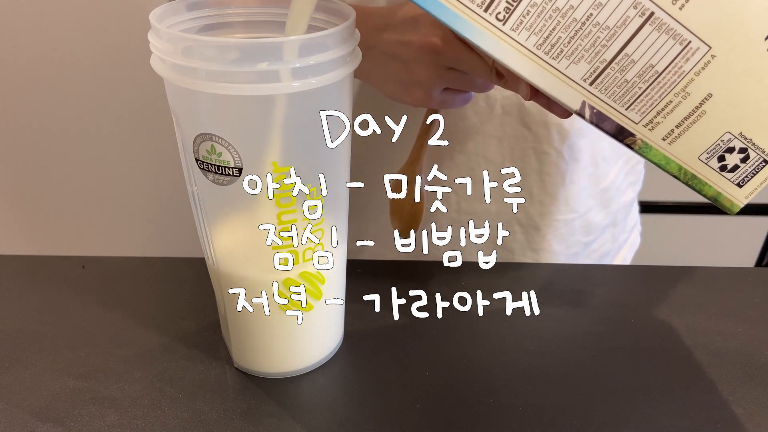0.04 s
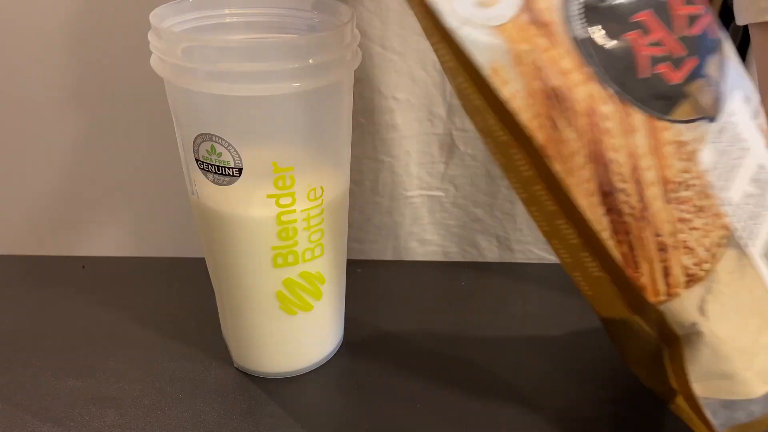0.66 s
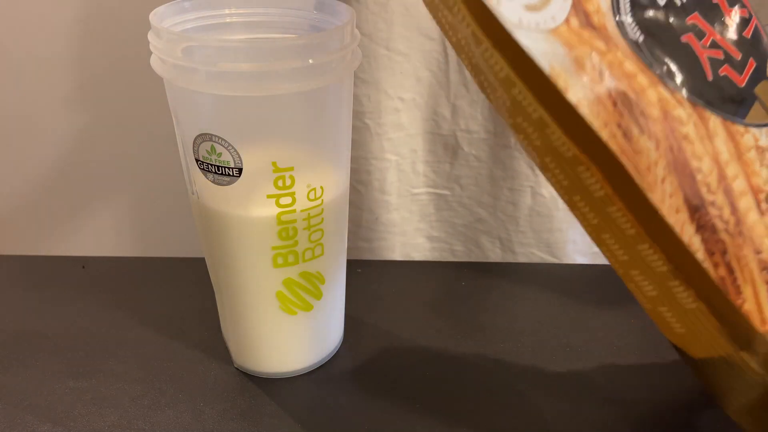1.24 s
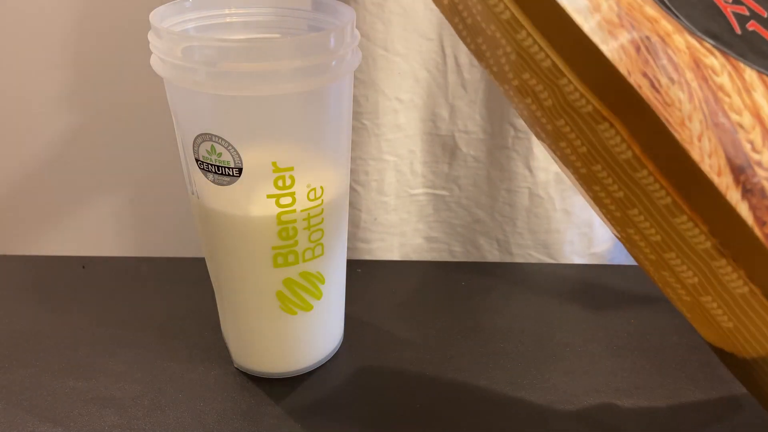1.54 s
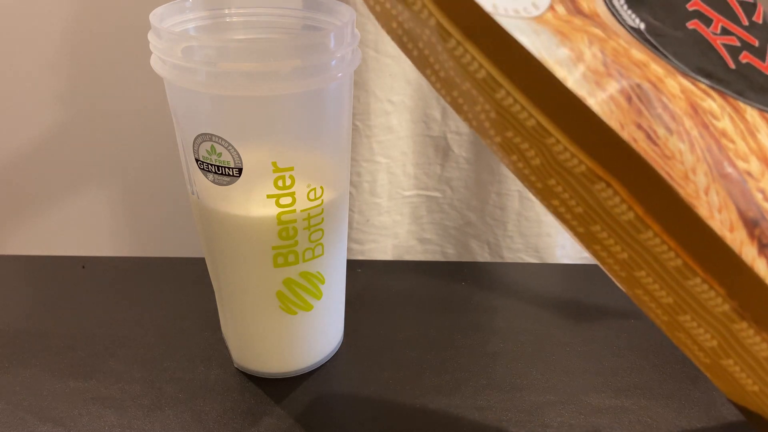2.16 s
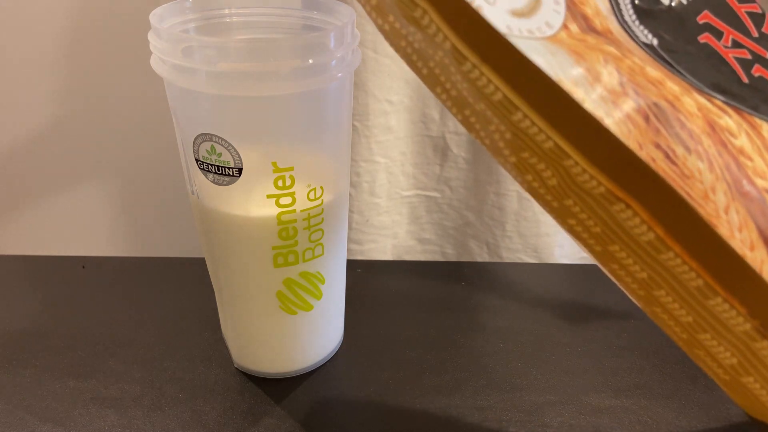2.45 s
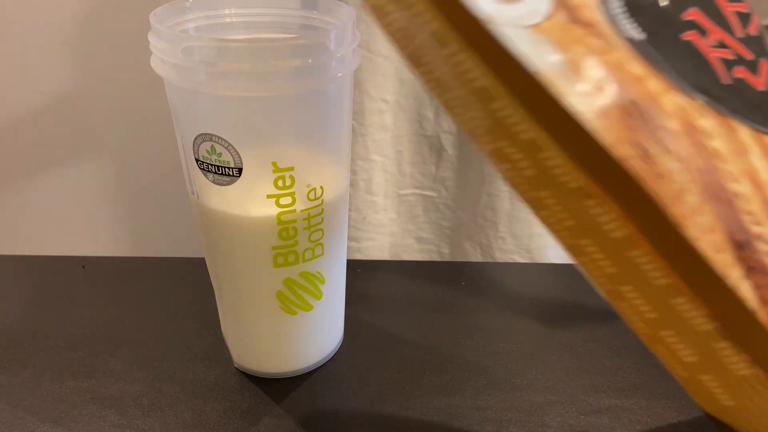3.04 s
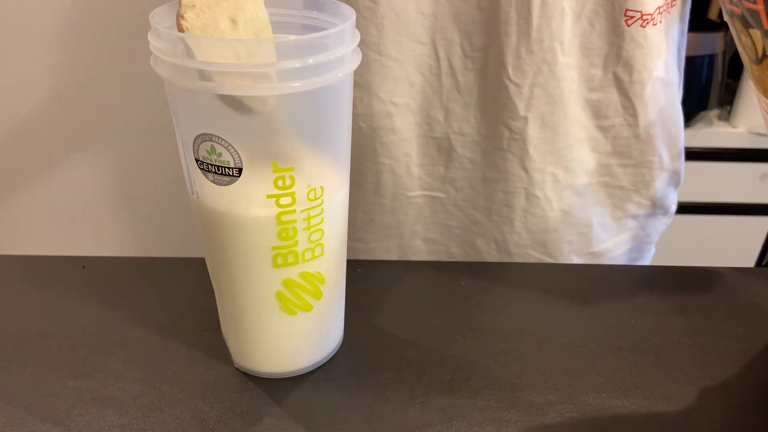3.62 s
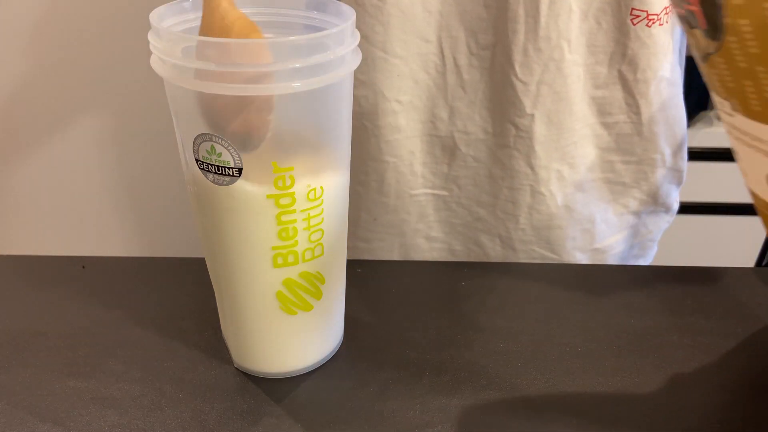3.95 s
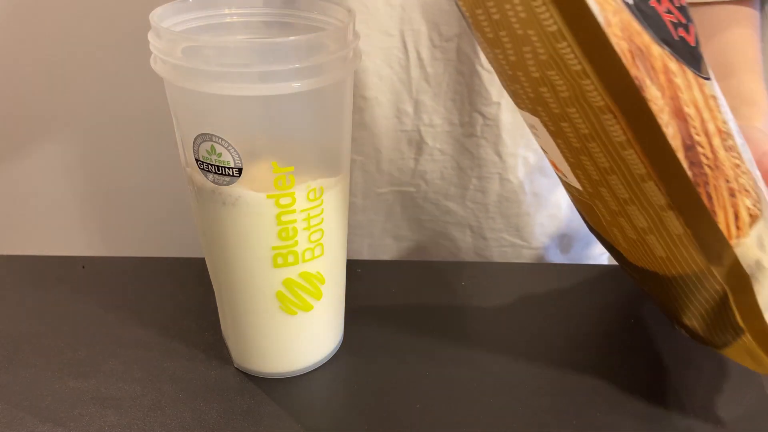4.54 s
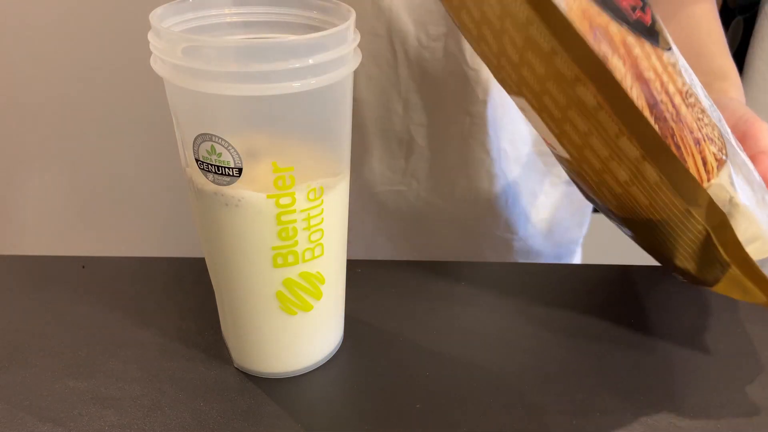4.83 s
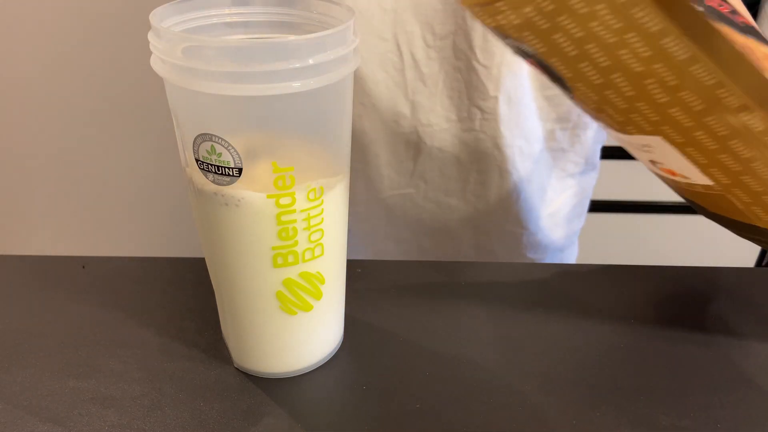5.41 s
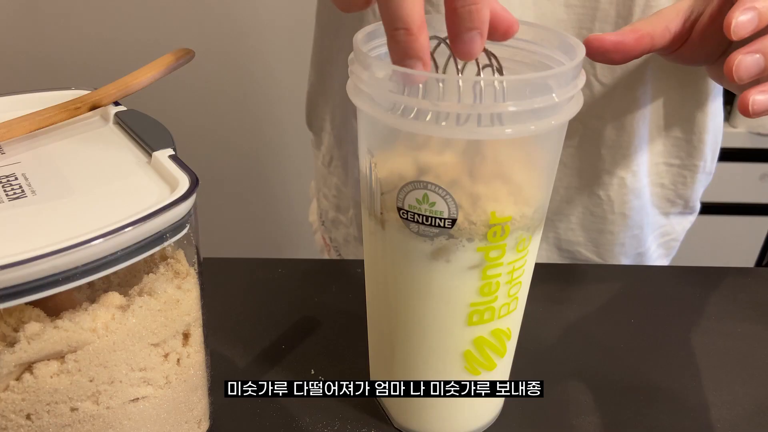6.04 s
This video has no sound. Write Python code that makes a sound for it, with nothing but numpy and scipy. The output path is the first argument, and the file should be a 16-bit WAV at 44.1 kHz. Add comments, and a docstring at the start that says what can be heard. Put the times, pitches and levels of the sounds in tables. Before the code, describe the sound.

Close kitchen handling sounds: a pouch set down and scooped from, a soft plop, a spoon tap, then crackling film and light clicks.

```python
"""A foil pouch of grain powder is set down on a kitchen table, rummaged in, put down again and pressed:
its creases crack, its film crinkles and its weight thumps the table. Early on, the last milk drips into a
plastic shaker cup, ringing tiny bubbles. Midway, a spoonful plops in and the wooden spoon taps the cup,
ringing its wall and the air inside. At the end a wire whisk ball clicks on the rim. A low appliance hum
fills the small room, and everything is heard through a phone close by."""
import sys
import numpy as np
from scipy import signal
from scipy.fft import rfft, irfft, next_fast_len
from scipy.io import wavfile

SR = 44100
rng = np.random.default_rng(int(sys.argv[2]) if len(sys.argv) > 2 else 0)


def dump(signal):
    """Clip the signal to [-1, 1] and save it as 16-bit WAV at the path in sys.argv[1]."""
    limited = np.clip(np.atleast_2d(signal).T, -1, 1)
    pcm = np.round(limited * 32767).astype(np.int16)
    wavfile.write(sys.argv[1], SR, pcm)


N = 276751
SIZE = 2 ** 15  # samples in one short sound or echo
TIME = np.arange(N) / SR
HZ = np.maximum(np.arange(SIZE // 2 + 1) * SR / SIZE, 1)

# The pouch is set down:
# (time [s], brushing before [s], delay of the thump [s], film level [dB], knock [dB], thump [dB])
LANDINGS = [(0.7542, .013, 0.0124, -41, -35.5, -23.5), (4.885, 0.03, 0.02, -36, -38, -27)]
# A fold gives way: (time [s], level [dB], crumbling time [s], treble edge [Hz])
FOLDS = [(4.728, -49.5, 0.043, 4500), (4.751, -49.5, 0.05, 5850), (5.407, -43.5, 0.021, 8700),
         (5.445, -49, 0.017, 12200), (5.491, -49.5, 0.0058, 11600), (5.750, -46.5, 0.028, 8900)]
# Creases crack, and the spoon ticks once inside the pouch (the 2.223 s row): (time [s], level [dB], tilt
# [dB/octave], treble edge [Hz], stiffness [pitch factor])
CRACKS = [(0.7997, -56, 9.5, 6960, 0.5), (0.901, -56.5, 10, 6000, 1.27), (2.223, -73, -6.5, 1410, 0.73),
          (4.8844, -27.5, 2.2, 17500, 1.16), (5.096, -42, 1, 6400, .92), (5.247, -42, -0.5, 5000, 1.02),
          (5.288, -29.5, -2, 5570, 1), (5.591, -64.5, -6, 7840, 1), (5.6481, -45.5, -2.5, 4500, 0.94),
          (5.69, -50.5, -0.5, 10000, 1.1), (5.7572, -46.5, 4, 9500, 1.04), (5.901, -54, 4, 9960, 1.24),
          (5.933, -59.5, 5.5, 12100, 0.98)]
# The spoon digs in the pouch: (time [s], hold [s], level [dB], pitch of the scraped patch [Hz])
SCOOPS = [(0.83, 0.14, -62, 1330), (0.987, 0.032, -63, 3500), (1.052, 0.1, -61.5, 1650),
          (1.179, 0.033, -59.5, 2100), (1.35, 0.13, -74.5, 3200), (1.55, .18, -84, 2400),
          (1.747, 0.079, -68.5, 1600), (1.862, 0.087, -72, 1370)]
# Rubbing strokes: (time [s], hold [s], level [dB])
SPOON_PULL_OUT = [(3.144, 0.019, -53.5)]
PRESSES = [(4.9, 0.18, -57), (5.15, 0.16, -52.5), (5.41, 0.028, -50.5), (5.67, 0.082, -48.5)]
FILM_SLIPS = [(4.9, 0.25, -62), (5.14, 0.11, -57.5), (5.29, 0.19, -62), (5.52, 0.29, -67.5),
              (5.69, 0.25, -67.5)]
POWDER_SLIDES = [(3.755, 0.067, -67)]
# Light bumps on the table: (time [s], level [dB])
BUMPS = [(4.95, -44), (5.057, -48), (5.292, -40.5), (5.503, -44), (6.151, -48.5)]
# A pouch corner meets the table before the full weight: (time [s], level [dB], treble edge [Hz])
CORNERS = [(.742, -34, 84), (4.888, -35, 430)]
# The spoon taps the cup: (time [s], level [dB], treble edge [Hz])
TAPS = [(4.063, -45, 1650), (4.0937, -66.5, 7050)]
# Drops of milk: (time [s], bubble pitch [Hz], level [dB], ring width [Hz])
DRIPS = [(.345, 4970, -71, 268), (0.488, 2500, -76, 151)]
# The whisk ball clicks: (time [s], level [dB], rattling time [s])
WHISK_CLICKS = [(6.148, -37.5, 0.0034), (6.1615, -49.5, .006), (6.228, -50, 0.0013)]

# Modes, the notes a thing rings at; narrow ones ring longer: (pitch [Hz], width [Hz], level [dB])
POUCH_MODES = [(447, 1600, 0), (755, 55, 7), (1290, 300, 2.5), (1755, 130, 2), (2110, 160, -1),
               (3115, 320, -5.5), (4030, 540, -11), (6520, 13000, -23), (12300, 12000, -5.5)]
CREASE_MODES = [(728, 110, -1), (1280, 250, -1.5), (1597, 150, 6.5), (1790, 98, 4.5), (2180, 110, -4),
                (3030, 570, -8.5), (4110, 410, -8), (7300, 5900, -19), (10380, 2500, -25.5)]
HOLLOW_MODES = [(458, 630, 0), (783, 330, 4), (1450, 180, 6), (1680, 220, -14), (3800, 500, -15)]  # the space inside the open pouch
TABLE_MODES = [(67, 15, 0.5), (91.1, 10.4, 1.5), (163.3, 7.9, -5.5), (298, 11, -7.5), (341.4, 27, -10.5)]
CUP_AIR_MODES = [(650, 130, -2.5), (756, 41, 5), (848, 26, -3.5)]  # the air above the milk
CUP_WALL_MODES = [(85.6, 4.8, 11.5), (158.8, 17, 5.5), (1580, 400, -22), (2610, 26, -9), (2670, 310, -21),
                  (3580, 440, -24), (5100, 870, -30)]
WHISK_MODES = [(703, 77, 3.5), (1290, 3200, -8.5), (1495, 14, 10.5), (5080, 1700, -6), (7600, 3500, -13.5),
               (11000, 7800, -13), (14900, 1300, -9)]

# Tone curves, from bass to treble: (frequency [Hz], level [dB])
SWISH_TONE = [(200, -1), (2600, -2.5), (3200, -18.5), (4600, -11.5), (5600, -29), (16000, -40)]
FILM_TONE = [(500, -8.5), (2500, 11.5), (8000, 4.5), (16000, 0)]
RUMBLE_TONE = [(20, -36), (40, -3.5), (58, 2.5), (85, -0.5), (120, -8), (175, -9.5), (400, -25.5),
               (760, -34.5), (4000, -45.5), (15000, -57.5)]
ECHO_TONE = [(40, -23), (220, 7), (450, 1.5), (750, 2), (1400, -1.5), (3000, 0.5), (6000, -0.5),
             (16000, -8.5)]
# How long the room echoes: (frequency [Hz], time to fade by 60 dB [s])
ECHO_TIMES = [(150, 0.44), (500, 0.29), (2000, 0.21), (2650, .38), (3700, 0.22)]
# The appliance hums: (pitch [Hz], level [dB])
HUM_NOTES = [(59.2, -63), (86.1, -67.5), (172.3, -75.5)]
# The left microphone is the brighter one: (frequency [Hz], left minus right [dB])
MIC_BALANCE = [(1300, 1), (4000, 3)]


def pouch(room):
    """Creases crack and crumple, the powder lands with a knock, and the stiff film is rubbed."""
    folds = [blow(s, db, tilt_db=-2, edge_hz=edge_hz, crumble_s=crumble_s)
             for s, db, crumble_s, edge_hz in FOLDS]
    for s, brush_s, _, film_db, _, _ in LANDINGS:
        folds += landing(s, brush_s, film_db)
    crumples = strike(folds, POUCH_MODES, clean_s=0.00026, rise=0.21, low_hz=284, side_db=-4)
    cracks = crease_cracks()
    weights = [blow(s + 0.0031, knock_db, tilt_db=-1.5, edge_hz=900, crumble_s=0.015)
               for s, _, _, _, knock_db, _ in LANDINGS]
    knocks = strike(weights, HOLLOW_MODES, clean_s=0.00074, rise=1, low_hz=150, side_db=-4)
    pull = strokes(SPOON_PULL_OUT, attack_s=0.014, release_s=0.035)
    swish = rub(pull, spectrum(SWISH_TONE), uneven_db=-1.5, patchy_db=1.5, side_db=0.5)
    press = strokes(PRESSES, attack_s=0.043, release_s=0.087)
    creasing = amp(-5.5) * flex(press)
    slips = strokes(FILM_SLIPS, attack_s=0.075, release_s=0.042)
    crinkle = rub(slips, spectrum(FILM_TONE), uneven_db=2, patchy_db=2, side_db=-6.5)
    film = crumples + knocks + rummage() + swish + creasing + crackle(press) + crinkle
    sound = place(cracks, room, pan_db=-1.5, wet_db=-7) + place(film, room, pan_db=-1, wet_db=-8.5)
    return sound * np.clip((5.95 - TIME) / 0.0014, 0, 1)  # falls silent at 5.95 s


def landing(s, brush_s, film_db):
    """The pouch's bottom brushes the table, slaps flat, then crumples under the powder's weight."""
    return [blow(s - brush_s, film_db - 3, tilt_db=0.5, edge_hz=9100, crumble_s=1.26 * brush_s),
            blow(s, db=-37.5, tilt_db=-1.5, edge_hz=SR, crumble_s=0.0033),
            blow(s + 0.008, film_db, tilt_db=-2, edge_hz=5100, crumble_s=0.039)]


def crease_cracks():
    """Single creases snap, and the spoon ticks once inside the pouch; the stiffer the crease, the higher it
    rings."""
    out = 0
    for s, db, tilt_db, edge_hz, stiffness in CRACKS:
        snap = blow(s, db, tilt_db, edge_hz, crumble_s=0.0037)
        modes = stiffen(CREASE_MODES, stiffness)
        out += strike([snap], modes, clean_s=0.0049, rise=0.31, low_hz=330, side_db=-2)
    return out


def flex(pressure):
    """Three patches of film, each of its own stiffness, rub unevenly, so the ringing keeps shifting."""
    out = 0
    for stiffness in (0.982, 1, 1.018):
        patch = resonances(stiffen(POUCH_MODES, stiffness, damping=0.5), tilt_db=1, edge_hz=3100)
        out += rub(pressure, patch, uneven_db=5, patchy_db=5.5, side_db=-9)
    return out / np.sqrt(3)


def crackle(pressure, pops_per_s=170):
    """Tiny creases pop one by one while the film is pressed."""
    popping = rng.random(N) < pops_per_s / SR
    pops = popping * rng.standard_normal((2, N)) * np.sqrt(SR / pops_per_s)
    ring = response(resonances(CREASE_MODES, tilt_db=5, edge_hz=4300))
    return amp(-3) * convolve(pops * pressure, ring)


def rummage():
    """Each scoop scrapes another patch of the pouch and rings its hollow; powder sifts over the film."""
    digging = total_effort = 0
    for s, hold_s, db, patch_hz in SCOOPS:
        effort = strokes([(s, hold_s, db)], attack_s=0.045, release_s=0.059)
        patch = resonances(HOLLOW_MODES + [(patch_hz, 300, 4)], edge_hz=5500)
        digging += rub(effort, patch, uneven_db=3.5, patchy_db=3, side_db=-7.5)
        total_effort += effort
    sifting = amp(-50) * total_effort ** 0.4  # gains 0.4 dB for each dB of effort
    soft_hiss = spectrum(FILM_TONE) / (1 + (HZ / 13000) ** 2)
    return digging + rub(sifting, soft_hiss, uneven_db=3.5, patchy_db=6, side_db=-6)


def table(room):
    """The heavy pouch and the handled cup thump the table top; heavier loads sound duller."""
    loads = BUMPS + [(s + delay_s, thump_db) for s, _, delay_s, _, _, thump_db in LANDINGS]
    heavy_db = -34  # thumps lighter than this tilt toward the treble
    blows = [blow(s, db, tilt_db=0.37 * (heavy_db - db), edge_hz=280, crumble_s=0.0007)
             for s, db in loads]
    blows += [blow(s, db, tilt_db=4, edge_hz=edge_hz, crumble_s=0.00072) for s, db, edge_hz in CORNERS]
    thumps = strike(blows, TABLE_MODES, clean_s=0.015, rise=0.3, low_hz=45, side_db=-12)
    return place(thumps, room, pan_db=0, wet_db=-11)


def cup(room):
    """Powder and spoon ring the cup's wall and the air above the milk, out through the open top."""
    before = CUP_WALL_MODES + CUP_AIR_MODES
    # The spoonful raises the milk and so the air's pitch; the spoon damps the ringing.
    after = CUP_WALL_MODES + stiffen(CUP_AIR_MODES, 1.06, damping=2.5)
    splat = strike(plop(), before, clean_s=0.0028, rise=0.13, low_hz=50.6, side_db=-0.5)
    knocks = strike(spoon_taps(), after, clean_s=0.0015, rise=0.27, low_hz=50, side_db=1.5)
    slide = strokes(POWDER_SLIDES, attack_s=0.0041, release_s=0.15)
    slide_tone = resonances(before, tilt_db=4.5, edge_hz=430)
    powder = rub(slide, slide_tone, uneven_db=2, patchy_db=-3, side_db=1)
    open_cup = response(resonances([(770, 6.8, 0)], tilt_db=3, edge_hz=970))
    faint_note = amp(-89.5) * convolve(grains(N, side_db=-2.3), open_cup)
    return place(splat + knocks + powder, room, pan_db=0, wet_db=-6) + faint_note


def plop(s=3.5115):
    """A spoonful splats on the milk, sinks with a hollow gulp, and loose crumbs follow."""
    return [blow(s, db=-30, tilt_db=1, edge_hz=4200, crumble_s=0.013),
            blow(s + 0.018, db=-32.5, tilt_db=-2, edge_hz=1160, crumble_s=0.00054),
            blow(s + 0.048, db=-43, tilt_db=2, edge_hz=2600, crumble_s=0.025)]


def spoon_taps(gap_s=0.0071, loss_db=0.5, softening=0.38):
    """The spoon knocks the wall and chatters against it, each bounce duller than the last."""
    return [blow(s + k * gap_s, db - k * loss_db, tilt_db=6, edge_hz=edge_hz * softening ** k,
                 crumble_s=0.0022)
            for s, db, edge_hz in TAPS for k in range(3)]


def whisk(room):
    """The wire ball, damped by the fingers, clicks and rattles against the plastic rim."""
    blows = [blow(s, db, tilt_db=-1, edge_hz=11300, crumble_s=rattle_s)
             for s, db, rattle_s in WHISK_CLICKS]
    clicks = strike(blows, WHISK_MODES, clean_s=0.0005, rise=0.1, low_hz=564, side_db=-6)
    return place(clicks, room, pan_db=0.5, wet_db=-5.5)


def drips(room):
    """Each last drop of milk splashes and traps a tiny ringing bubble."""
    out, t = np.zeros((2, N)), TIME[:SIZE]
    splash_ring = response(resonances([(4600, 400, 0)]))
    for s, hz, db, width in DRIPS:
        bubble = unit(np.sin(2 * np.pi * hz * t) * t * np.exp(-2 * np.pi * width * t))
        splash = convolve(grains(SIZE) * np.exp(-t / 0.0016), splash_ring)
        add(out, s, db, bubble + amp(-9) * unit(splash))
    return place(out, room, pan_db=11, wet_db=-0.5)


def kitchen_echo():
    """Dense echoes off the walls; the bass lasts longest and is alike in left and right."""
    t = TIME[:SIZE]
    centres, fade_times = np.transpose(ECHO_TIMES)
    mid, side = rfft(rng.standard_normal((2, SIZE)))
    apart = HZ ** 2 / (HZ ** 2 + 300 ** 2)
    noise = (mid + apart * np.array([side, -side])) / np.sqrt(1 + apart ** 2)
    tail = 0
    for share, fade_s in zip(np.eye(len(centres)), fade_times):
        band = np.interp(np.log(HZ), np.log(centres), share)
        tail += irfft(noise * band) * amp(-60 * t / fade_s)
    tail = unit(tail * (1 - np.exp(-t / 0.0018)))
    return convolve(tail, response(spectrum(ECHO_TONE)))


def background():
    """Steady rumble and faint hiss, with the wavering hum of an appliance."""
    tone = spectrum(RUMBLE_TONE)
    rumble = amp(-62) * convolve(grains(N, side_db=-7), response(tone))
    wide_hiss = amp(-78) * convolve(grains(N, side_db=25), response(tone * HZ / (HZ + 600)))
    hum = sum(amp(db) * np.sqrt(2) * np.sin(2 * np.pi * hz * TIME + 0.55 * wander(per_s=4.6))
              for hz, db in HUM_NOTES)
    return rumble + wide_hiss + hum


def blow(s, db, tilt_db, edge_hz, crumble_s):
    """One hit: its time, level, tilt per octave, treble edge and the time it takes to crumble."""
    return s, db, tilt_db, edge_hz, crumble_s


def strike(blows, modes, clean_s, rise, low_hz, side_db):
    """Hits ring a body: those shorter than clean_s are mostly one pulse, longer ones turn grainy."""
    out, t = np.zeros((2, N)), TIME[:SIZE]
    bass_cut = 1 / np.sqrt(1 + (low_hz / HZ) ** 2)  # small things give off little bass
    for s, db, tilt_db, edge_hz, crumble_s in blows:
        contact = np.exp(-t / crumble_s) * (1 - np.exp(-t / (rise * crumble_s)))
        force = unit(grains(SIZE, uneven_db=0.99, side_db=side_db) * contact) * crumble_s / clean_s
        force[:, 0] += 1  # the clean pulse
        ring = response(bass_cut * resonances(modes, tilt_db, edge_hz))
        add(out, s, db, convolve(force, ring))
    return out


def strokes(rows, attack_s, release_s):
    """Pressure of rubbing strokes: each builds up, holds and lets go."""
    out = 0
    for s, hold_s, db in rows:
        age = np.maximum(TIME - s, 0)
        build_up = 1 - np.exp(-age / attack_s)
        let_go = np.exp(-np.maximum(age - hold_s, 0) / release_s)
        out += amp(db) * build_up * let_go
    return out


def rub(pressure, tone, uneven_db, patchy_db, side_db):
    """Sliding: dense grains catch and slip, their level wandering by about patchy_db."""
    grip = amp(patchy_db * np.clip(wander(per_s=45), -2, 2))
    grip /= np.sqrt(np.mean(grip ** 2))
    return convolve(grains(N, uneven_db, side_db) * pressure * grip, response(tone))


def grains(size, uneven_db=0, side_db=0):
    """Noise of tiny contacts; uneven_db varies their strength, side_db widens the stereo."""
    mid, side = rng.standard_normal((2, size))
    strength = amp(uneven_db * np.minimum(rng.exponential(size=size), 6))
    stereo = mid + amp(side_db) * np.array([side, -side])
    return unit(strength * stereo) * np.sqrt(size)


def wander(per_s):
    """A smooth random drift with a spread near one."""
    knots = np.arange(0, N / SR + 1, 1 / per_s)
    return np.interp(TIME, knots, rng.standard_normal(len(knots)))


def stiffen(modes, factor, damping=1):
    """The same modes, moved in pitch by a factor and widened by damping."""
    return [(hz * factor, width * damping, db - 10 * np.log10(damping)) for hz, width, db in modes]


def resonances(modes, tilt_db=0, edge_hz=SR):
    """Tone curve of a ringing body, tilted by tilt_db per octave and dulled above edge_hz."""
    power = sum(amp(db) ** 2 / (1 + ((HZ ** 2 - hz ** 2) / (HZ * width)) ** 2)
                for hz, width, db in modes)
    octaves = np.log2(np.maximum(HZ, modes[0][0]))
    return np.sqrt(power / (1 + (HZ / edge_hz) ** 4)) * amp(tilt_db * octaves)


def spectrum(points, hz=HZ):
    """Tone curve drawn through (frequency [Hz], level [dB]) points."""
    point_hz, db = np.transpose(points)
    return amp(np.interp(np.log(hz), np.log(point_hz), db))


def response(tone):
    """The ring that one sharp click leaves in a body with this tone curve."""
    cepstrum = irfft(np.log(tone / tone.max() + 1e-6))
    cepstrum[1:SIZE // 2] *= 2  # folded forward, so nothing rings before the click
    cepstrum[SIZE // 2 + 1:] = 0
    return unit(irfft(np.exp(rfft(cepstrum))))


def convolve(x, ring):
    """Send each channel through a ring or echo, keeping the length."""
    return signal.fftconvolve(np.atleast_2d(x), np.atleast_2d(ring), axes=-1)[:, :x.shape[-1]]


def place(x, room, pan_db, wet_db):
    """Direct sound leaning left by pan_db, plus the room's echo at wet_db."""
    direct = x * amp(np.array([[pan_db], [-pan_db]]) / 2)
    return direct + amp(wet_db) * convolve(x.mean(axis=0), room)


def add(out, s, db, sound):
    """Mix in a sound at time s, with the energy of 10 ms at this level."""
    start = int(s * SR)
    out[:, start:start + SIZE] += (amp(db) * np.sqrt(SR / 100) * unit(sound))[:, :N - start]


def amp(db):
    """Decibels to gain."""
    return 10 ** (np.asarray(db) / 20)


def unit(x):
    """Scale to an average energy of one per channel."""
    return x / np.sqrt(np.mean(np.sum(x ** 2, axis=-1)))


def scene():
    """All sources share the one room."""
    room = kitchen_echo()
    return pouch(room) + table(room) + cup(room) + drips(room) + whisk(room) + background()


def record(dry, shared_hz=6500, lag_s=0.000224, top_hz=16000):
    """The phone's high treble is one signal, flipped and slightly late on the right; the top is cut."""
    size = next_fast_len(N + SIZE)
    left, right = rfft(dry, size)
    hz = np.arange(len(left)) * SR / size
    lean = np.sqrt(spectrum(MIC_BALANCE, np.maximum(hz, 1)))
    left, right = left * lean, right / lean
    blend = np.pi / 2 * np.clip((hz - shared_hz) / 3000 + 0.5, 0, 1)
    late_left = left * np.exp(-2j * np.pi * hz * lag_s)
    right = np.cos(blend) * right - np.sin(blend) * late_left
    sound = irfft(np.array([left, right]), size)[:, :N]
    return signal.sosfilt(signal.ellip(8, 0.2, 70, top_hz, fs=SR, output="sos"), sound)


dry = scene()
out = record(dry)
dump(out)
```